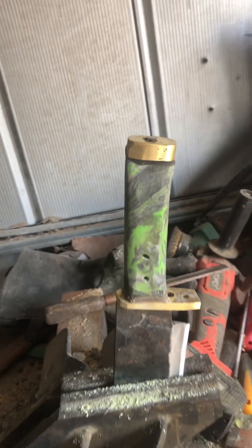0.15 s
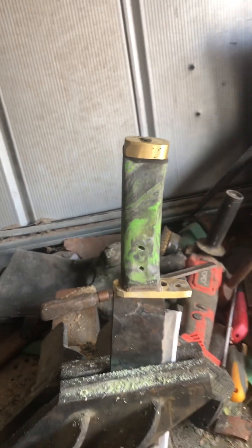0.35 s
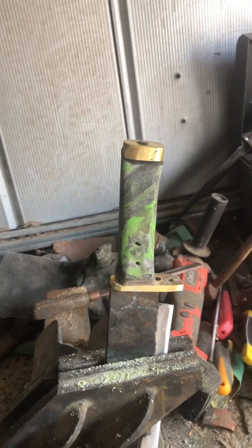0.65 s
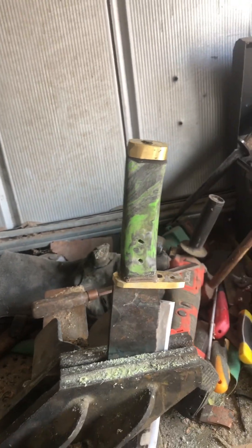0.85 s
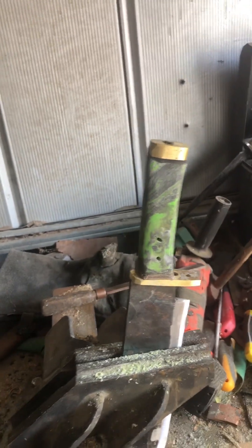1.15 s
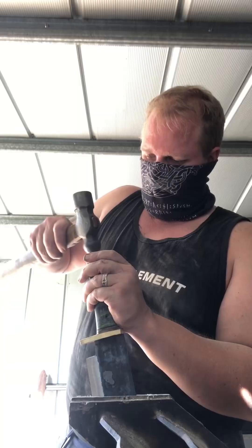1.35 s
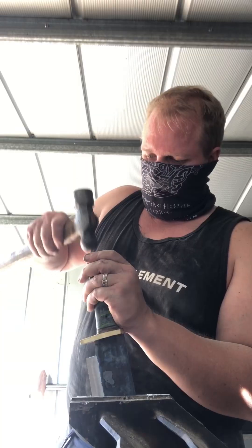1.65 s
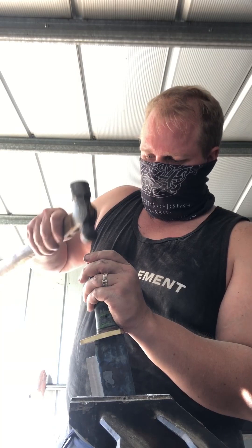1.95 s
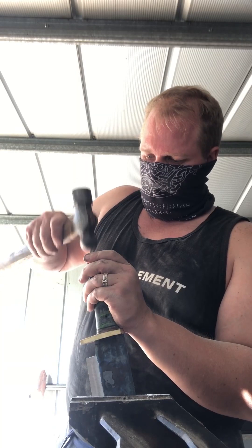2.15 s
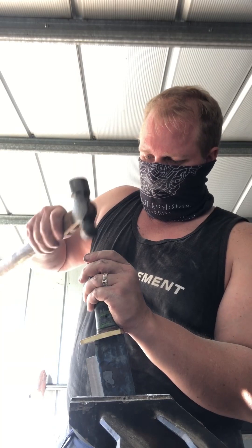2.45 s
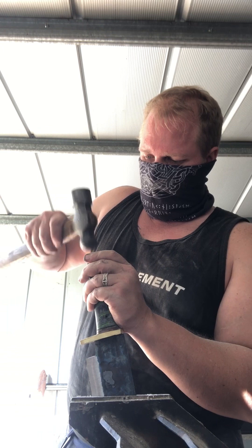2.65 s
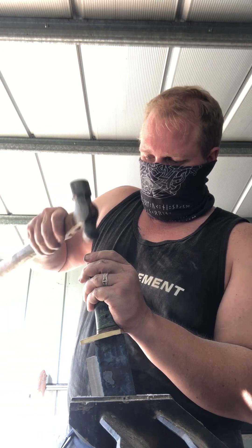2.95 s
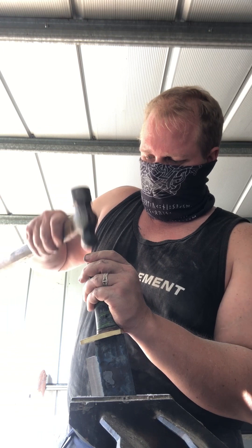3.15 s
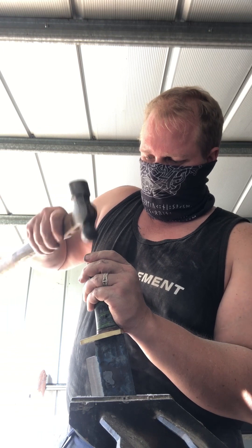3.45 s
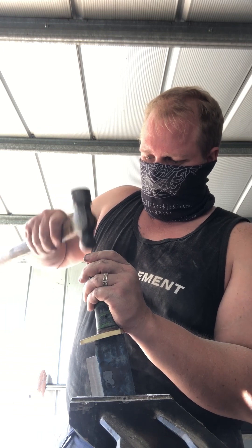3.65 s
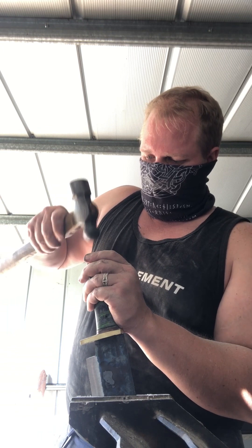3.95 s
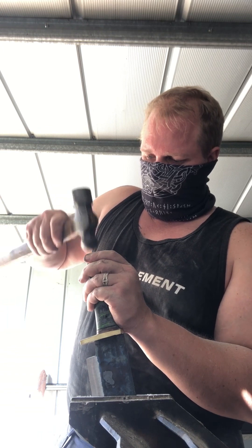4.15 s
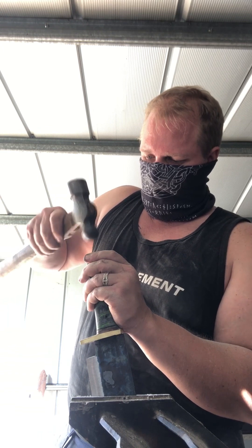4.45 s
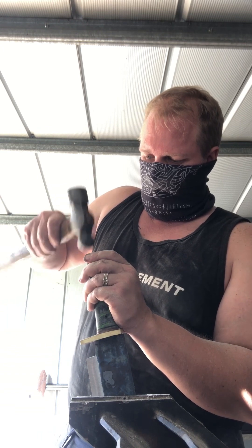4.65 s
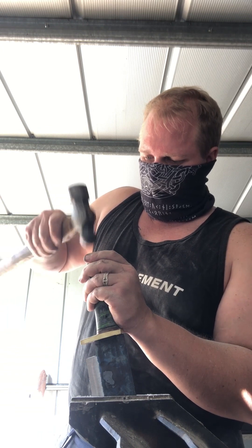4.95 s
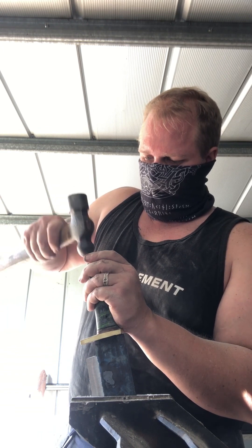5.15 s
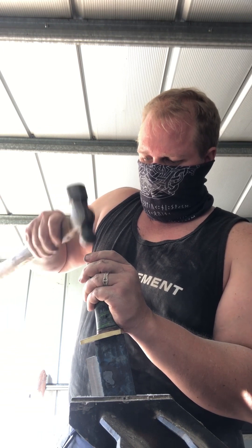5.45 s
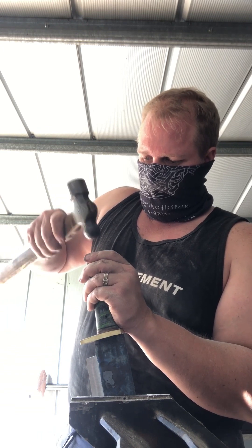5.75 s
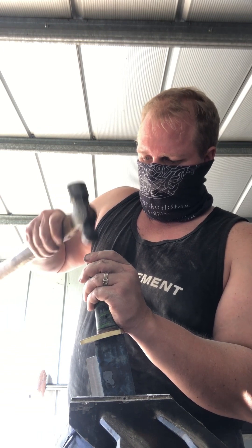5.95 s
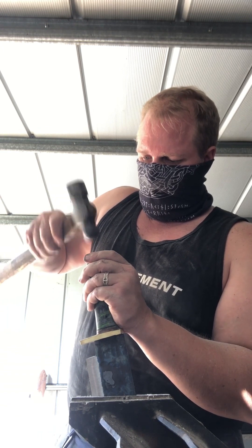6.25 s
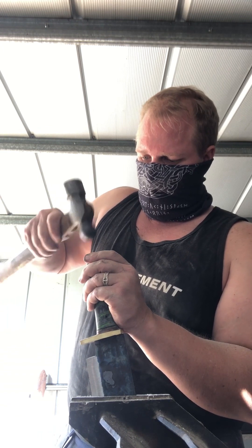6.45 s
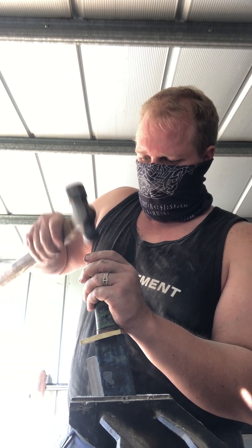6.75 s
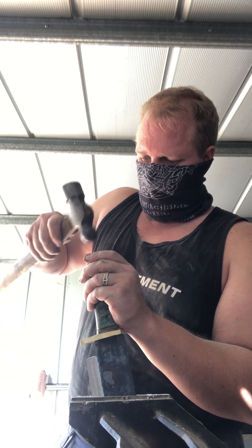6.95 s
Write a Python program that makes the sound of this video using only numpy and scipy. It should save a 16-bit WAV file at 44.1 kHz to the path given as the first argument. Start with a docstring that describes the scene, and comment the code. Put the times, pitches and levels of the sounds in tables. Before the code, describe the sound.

A small hammer steadily strikes the steel end of a knife in a vice, ringing briefly in a metal shed.

```python
"""A quiet sheet-metal shed: still air, a thin whine, a dull rustle dying away. Something slides and
catches in one soft scuff; two faint squeaks and a tick follow. At 1.275 s hammering cuts in over a
faint hiss: a small ball-peen hammer rivets the tang of a knife in a vice, four blows a second.
Each blow is a steel-on-steel crack and a short clank; the wall booms, the roof throws the knock
back, and blade, vice and shed ring on briefly."""
import sys
import numpy as np
from scipy import signal
from scipy.fft import rfft, irfft
from scipy.io import wavfile

SR = 44100
rng = np.random.default_rng(int(sys.argv[2]) if len(sys.argv) > 2 else 0)


def digitize_waveform(pressure):
    """Quantize a signal to 16-bit integers and store it at the path in sys.argv[1].

    Rows of a 2-D input are taken as channels; values are limited to [-1, 1].
    """
    field = np.atleast_2d(pressure).T
    bounded = np.clip(field, -1, 1)
    quanta = np.round(bounded * 32767).astype(np.int16)
    wavfile.write(sys.argv[1], SR, quanta)


N = 312669
TIME_S = np.arange(N) / SR
AGE_S = TIME_S[:SR]  # time within a 1 s event
BINS_HZ = np.fft.rfftfreq(SR, 1 / SR)
CUT_IN_S = 1.275  # hammering and hiss


def undb(db):
    """Decibels to gain."""
    return 10 ** (np.asarray(db) / 20)

def at_hz(rows, hz):
    """Interpolate (f/Hz, value) rows over log frequency."""
    points, values = np.transpose(rows)
    return np.interp(np.log(hz + 1e-3), np.log(points), values)

def noise(colour, size):
    """Unit-rms noise; colour gives its spectral density."""
    gain = undb(at_hz(colour, np.fft.rfftfreq(size, 1 / SR)))
    shaped = irfft(rfft(rng.standard_normal(size)) * gain, size)
    return shaped / shaped.std()

def fade(t60_s, rise_s):
    """Exponential rise and decay."""
    return (1 - np.exp(-AGE_S / rise_s)) * np.exp(-np.log(1000) * AGE_S / t60_s)

def swell(start_s, rise_s, hold_s, fall_s):
    """Attack, hold, release; rounded corners."""
    end_s = start_s + rise_s + hold_s + fall_s
    ramp = np.minimum((TIME_S - start_s) / rise_s, (end_s - TIME_S) / fall_s)
    return np.sin(np.pi / 2 * np.clip(ramp, 0, 1)) ** 2

def add(out, start_s, sound):
    """Mix sound into out at start_s."""
    start = round(start_s * SR)
    part = sound[:max(len(out) - start, 0)]
    out[start:start + len(part)] += part

def struck_modes(modes, rise_s):
    """Damped modes, each starting when the blow reaches it."""
    out = np.zeros(SR)
    for hz, db, t60_s, delay_s in modes:
        add(out, delay_s, undb(db) * fade(t60_s, rise_s) * np.sin(2 * np.pi * hz * AGE_S))
    return out


# air and rustle spectrum: f/Hz, level/dB
AIR_SPECTRUM = [(25, -12), (75, 5), (106, -7), (250, -6), (700, -14), (1300, -9), (2850, -23), (6200, -23),
                (7200, -29), (15000, -35)]
def air(db=-61):
    """Still air of the shed: steady low noise."""
    return undb(db) * noise(AIR_SPECTRUM, N)

def rustle(db=-51.5, t60_s=1.0):
    """Dull rustle, coloured like the air, dying from the start."""
    return air(db) * np.exp(-np.log(1000) * TIME_S / t60_s)

def whine(hz=8010, steady_db=-77.5, swell_db=-76):
    """Thin tone; swells in the lull after the scuff."""
    rms = undb(steady_db) + undb(swell_db) * swell(start_s=.76, rise_s=.15, hold_s=.3, fall_s=.04)
    return np.sqrt(2) * rms * np.sin(2 * np.pi * hz * TIME_S)

# sliding and catching spectra: f/Hz, level/dB
SLIDE_SPECTRUM = [(180, -37), (300, -4.5), (814, -13.5), (975, -9.5), (1490, -4), (1790, -8), (1940, -7.5),
                  (5710, -18), (11200, -21), (15000, -29)]
CATCH_SPECTRUM = [(500, -20), (1600, 4), (4000, -3), (6500, -6), (11000, 0), (13000, -12), (16000, -25)]
def scuff(slide_db=-52.5, catch_db=-50.5, spread_db=3, catches=12, from_s=.58, to_s=.85):
    """Something slides briefly, catching unevenly while fastest."""
    slide = swell(start_s=.4, rise_s=.19, hold_s=.19, fall_s=.14)
    out = undb(slide_db) * noise(SLIDE_SPECTRUM, N) * slide
    for k in range(catches):
        start_s = from_s + (to_s - from_s) * (k + rng.random()) / catches
        db = catch_db + spread_db * rng.standard_normal()
        add(out, start_s, undb(db) * noise(CATCH_SPECTRUM, SR) * fade(t60_s=.05, rise_s=.00084))
    return out

# squeaks: t/s, length/s, level/dB
SQUEAK_EVENTS = [(1.095, .045, -64), (1.21, 0.1, -58)]
# squeak spectrum: f/Hz, level/dB
SQUEAK_SPECTRUM = [(1000, -40), (1300, -5), (1380, 3), (1480, -13), (1900, -38)]
def squeaks():
    """Faint swells of narrow-band noise."""
    band = noise(SQUEAK_SPECTRUM, N)
    return sum(undb(db) * band * swell(start_s, length_s / 2, 0, length_s / 2)
               for start_s, length_s, db in SQUEAK_EVENTS)

# tick spectrum: f/Hz, level/dB
TICK_SPECTRUM = [(200, -10), (1100, 3), (2600, -15), (5000, -19), (15000, -45)]
def tick(start_s=1.195, db=-48):
    """Small tick of something handled."""
    out = np.zeros(N)
    add(out, start_s, undb(db) * noise(TICK_SPECTRUM, SR) * fade(t60_s=.04, rise_s=.0005))
    return out

# hiss spectrum: f/Hz, level/dB
HISS_SPECTRUM = [(300, -10), (2500, -4), (5300, 0), (7000, -7), (9000, -12), (10800, -9), (12500, -18),
                 (15500, -20)]
def hiss(db=-62):
    """Steady faint hiss behind the hammering."""
    return undb(db) * noise(HISS_SPECTRUM, N) * (TIME_S > CUT_IN_S)

# crack spectrum: f/Hz, level/dB
CRACK_SPECTRUM = [(100, -24), (400, -4), (2300, 0), (2900, -6), (4000, -2), (5500, -3), (9000, -6),
                  (11000, -11), (13000, -20), (15500, -29)]
def crack(db=-8.2):
    """Steel-on-steel contact: a broadband burst."""
    return undb(db) * noise(CRACK_SPECTRUM, SR) * fade(t60_s=.022, rise_s=.0002)

# heavily damped modes: f/Hz, level/dB, t60/s, delay/s
CLANK_MODES = [(1860, -12, .04, 0), (2070, -11, .035, 0), (2230, -1.5, .008, 0), (2360, -8, .026, 0),
               (3840, -14, .085, 0), (1370, -14, .03, 0), (980, -9.5, .02, .003), (600, -13, .012, .003),
               (310, -10, .02, .002)]
def clank():
    """Hammer head and tang sound at once, vice and bench just after."""
    return struck_modes(CLANK_MODES, rise_s=.00035)

# blade, vice and bench modes: f/Hz, level/dB, t60/s
RING_MODES = [(153, -37, 1.4), (180, -26, 0.35), (209, -32, 1.3), (231, -29, 0.44), (258, -28, 0.38),
              (333, -24, 0.31), (804, -18, 0.36), (917, -17, 0.21), (940, -20, 0.21), (993, -19.5, 0.2),
              (1219, -20, 0.21), (1326, -24, 0.27), (1372, -24, 0.27), (1644, -23, 0.22), (1690, -22, 0.2),
              (1833, -24, 0.21), (1872, -29, 0.26), (2102, -24, 0.2), (2260, -27, 0.29), (2376, -28, 0.24),
              (3079, -36, 0.29), (3811, -20, 0.21), (3867, -21.5, 0.21), (3990, -31, 0.22),
              (4180, -30, 0.21), (4831, -44, 0.28), (5539, -37, 0.24), (5956, -40, 0.22), (7227, -41, 0.22),
              (9584, -45, 0.2), (10475, -46, 0.2)]
def ring(gain_db=1.6, rise_s=.02):
    """Lasting modes build up at random phases."""
    out = np.zeros(SR)
    for hz, db, t60_s in RING_MODES:
        out += undb(db) * fade(t60_s, rise_s) * np.sin(2 * np.pi * (hz * AGE_S + rng.random()))
    return undb(gain_db) * out

def steel_resonances(ripple_db=3.7, spacing_hz=45):
    """Crowded upper resonances of blade and vice, as gain per bin."""
    grid_hz = np.arange(0, SR / 2, spacing_hz)
    ripple = np.interp(BINS_HZ, grid_hz, rng.standard_normal(len(grid_hz)))
    return undb(ripple_db * ripple * np.interp(BINS_HZ, [1500, 4000], [0, 1]))

# reverberation spectrum: f/Hz, level/dB
SHED_SPECTRUM = [(25, -13), (80, -2.5), (130, -11.5), (200, 1.5), (350, 0.5), (550, -4), (1100, 0),
                 (1550, -1.5), (2300, 1), (2700, -7), (3900, -5.5), (5000, -11), (10000, -21.5),
                 (15500, -39.5)]
# reverberation decay: f/Hz, t60/s
SHED_DECAY = [(60, 0.78), (200, 0.56), (500, 0.4), (1200, 0.25), (2500, 0.22), (6000, 0.23), (14000, 0.16)]
def shed_tail(steel_gain, roof_lag_s=.019, early_gain=.27, hum_db=-30):
    """Dense reflections, unit energy: they swell as the roof answers; the sheeting hums on."""
    spectrum = rfft(rng.standard_normal(SR)) * steel_gain
    roof = early_gain + (1 - early_gain) * (1 + np.tanh((AGE_S - roof_lag_s) / .0051)) / 2
    hum = undb(hum_db) * fade(t60_s=1.0, rise_s=.0066)
    tail = np.zeros(SR)
    for centre_hz in 25 * 2 ** (np.arange(29) / 3):  # third octaves
        window = np.cos(np.pi / 2 * np.clip(3 * np.log2((BINS_HZ + 1e-3) / centre_hz), -1, 1))
        decay = fade(at_hz(SHED_DECAY, centre_hz), rise_s=.00042) + hum / (1 + (centre_hz / 1500) ** 2)
        band = irfft(spectrum * window) * roof * decay
        tail += band / np.linalg.norm(band) * undb(at_hz(SHED_SPECTRUM, centre_hz)) * np.sqrt(centre_hz)
    return tail / np.linalg.norm(tail)

# wall modes: f/Hz, level/dB, t60/s, delay/s
WALL_MODES = [(101.2, -23.5, 0.1, 0.0164), (197, -19.5, .13, 0.01803), (328, -27.5, 0.089, 0.01732),
              (476, -23, 0.13, .02)]
def wall_boom():
    """The sheet-metal wall booms as the blow reaches it."""
    return struck_modes(WALL_MODES, rise_s=.0039)

# roof and wall reflections: delay/s, level/dB
REFLECTIONS = [(0.0188, -7.5), (.025, -5), (.033, -12.5), (.042, -11.5)]
def echoes(knock, cutoff_hz=1400):
    """Ribbed sheeting scatters the treble; only the lows return intact."""
    dull = signal.sosfilt(signal.butter(2, cutoff_hz, fs=SR, output="sos"), knock)
    out = np.zeros(SR)
    for delay_s, db in REFLECTIONS:
        add(out, delay_s, undb(db) * dull)
    return out

def strike(steel_gain, shed_db=13):
    """One spot of the tang is hit: [knock, aftersound]."""
    knock = crack() + clank()
    after = undb(shed_db) * shed_tail(steel_gain) + ring() + wall_boom() + echoes(knock)
    return np.array([knock, after])

# blows: t/s, knock/dB, brightness/dB, off-centre/(0-1)
HAMMER_BLOWS = [(1.116, -3, 3, 0), (1.3609, 0, -3.4, 0.2), (1.6035, -0.5, -1.6, 0.2), (1.856, -1, -2, 0.2),
                (2.0947, -1.7, -2, 0.1), (2.3377, 5, -10, 0.5), (2.591, -2.4, -0.8, 0.21),
                (2.8399, -2.5, -1, 0.15), (3.0824, -3.4, -.6, 0.33), (3.334, -2.1, -1.5, 0.5),
                (3.5802, -2, -0.5, 0.47), (3.8282, 0.5, -2, .8), (4.0891, -3.2, -1.3, 0.32),
                (4.3314, -4, -0.5, 0.35), (4.5768, 1, -4, 0.48), (4.8295, -2.6, -1, 0.37),
                (5.0814, 5, -5.5, 0.84), (5.3291, -1, -0.5, 0.68), (5.5723, -6, 0.9, 0.35),
                (5.817, -5, 1.5, 0.35), (6.0586, -5, 2.5, 0.5), (6.3032, -3.6, 1.9, 0.7),
                (6.555, -2, 1.2, 0.52), (6.7988, 0.6, -0.2, 0.94), (7.0392, -0.4, 1.1, 0.72)]
# spectral share of knock/dB, mostly the vice jumping: f/Hz, share/(dB/dB)
KNOCK_WEIGHTS = [(300, 1.05), (1000, 1.86), (1400, 1.66), (2100, 0.74), (4000, 1.34), (8000, 0.9)]
# knock change at the very edge, where the vice rocks: f/Hz, level/dB
EDGE_EQ = [(300, -2.5), (550, 2.5), (1100, -6), (2100, -5.5), (3500, -0.5)]
def hammering(wander=.51, scatter=.2, thud_hz=1100, bright_hz=2900, thud_db_per_db=.2, loss_db_per_db=.37):
    """Blows on one spot sound nearly alike; off centre they excite the steel differently."""
    steel_gain = steel_resonances()
    centre, edge, *others = (strike(steel_gain) for _ in range(7))
    mean = np.mean([centre, edge, *others], axis=0)
    lows = 1 / (1 + (BINS_HZ / thud_hz) ** 4)
    highs = 1 - 1 / (1 + (BINS_HZ / bright_hz) ** 8)
    out = np.zeros(N)
    for start_s, knock_db, bright_db, off_centre in HAMMER_BLOWS:
        angle = np.pi / 2 * wander * off_centre
        blow = mean + np.cos(angle) * (centre - mean) + np.sin(angle) * (edge - mean)
        blow += scatter * sum(rng.standard_normal() * (spot - mean) for spot in others)
        knock, after = blow * np.linalg.norm(centre) / np.linalg.norm(blow)  # equal energy per spot
        knock_eq_db = knock_db * at_hz(KNOCK_WEIGHTS, BINS_HZ) + off_centre * at_hz(EDGE_EQ, BINS_HZ)
        tilt_db = bright_db * (highs - thud_db_per_db * lows)  # soft contact: more thud, less treble
        loss_db = loss_db_per_db * knock_db  # after a louder knock, ring and echo are weaker
        spectrum = (rfft(knock) * undb(knock_eq_db) + rfft(after)) * undb(tilt_db - loss_db)
        add(out, start_s, irfft(spectrum)[:SR * 9 // 10])
    return out * np.clip((TIME_S - CUT_IN_S) / .018, 0, 1)  # opens in the first blow's tail


def scene():
    """Mono mix below the vice."""
    return (hammering() + rustle() + scuff() + tick() + squeaks() + hiss() + air() + whine())[None]

def record(dry, bass_hz=55, ceiling=.93, top_hz=15800):
    """Thin the deep bass, round the peaks, cut the top."""
    thin = signal.sosfilt(signal.butter(2, bass_hz, "high", fs=SR, output="sos"), dry)
    rounded = thin / (1 + (thin / ceiling) ** 6) ** (1 / 6)
    return signal.sosfilt(signal.ellip(8, .2, 70, top_hz, fs=SR, output="sos"), rounded)


dry = scene()
out = record(dry)
digitize_waveform(out)
```